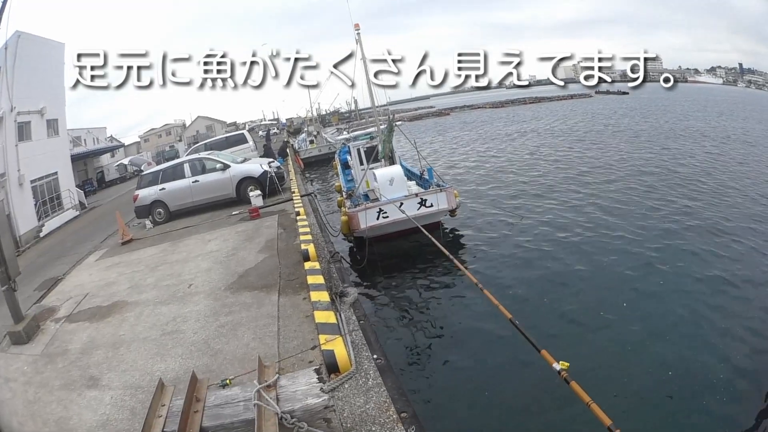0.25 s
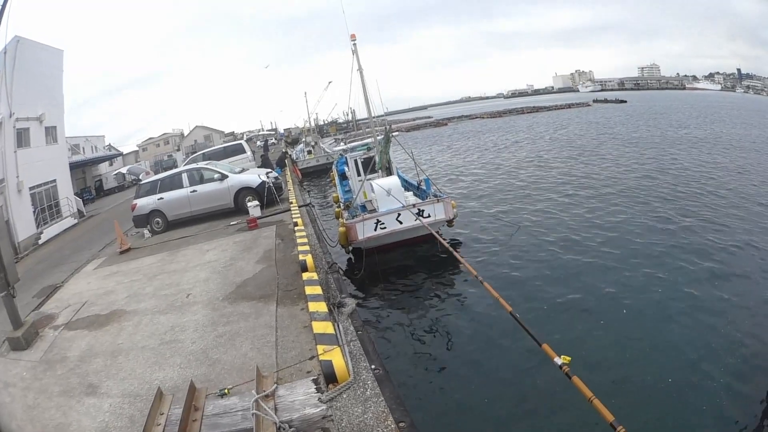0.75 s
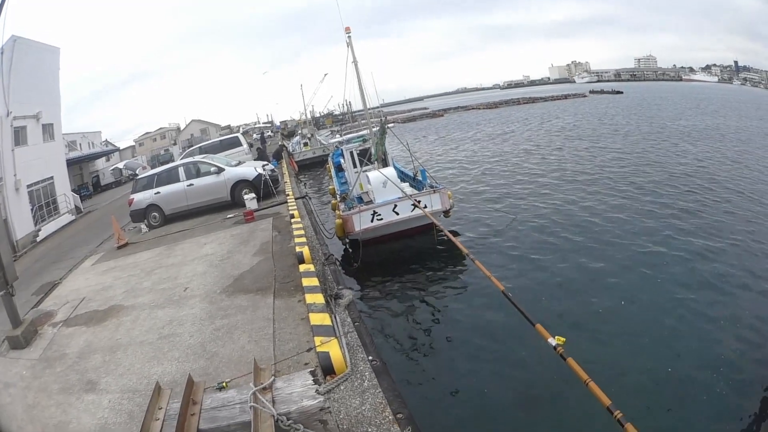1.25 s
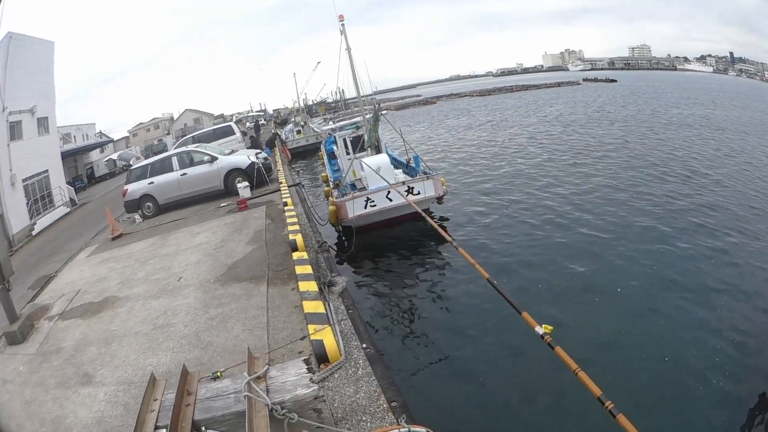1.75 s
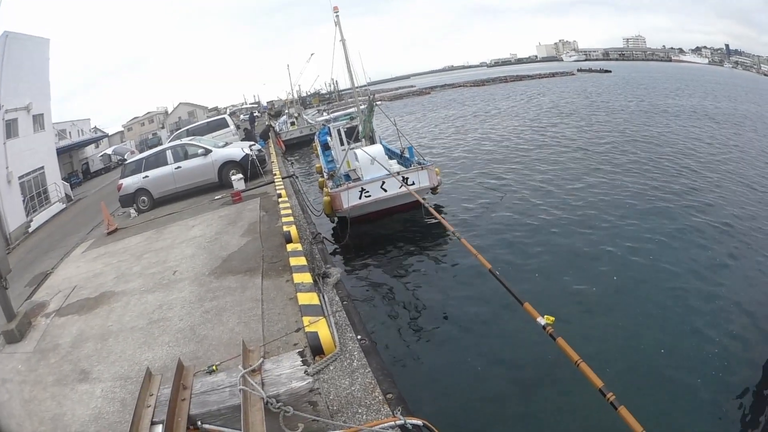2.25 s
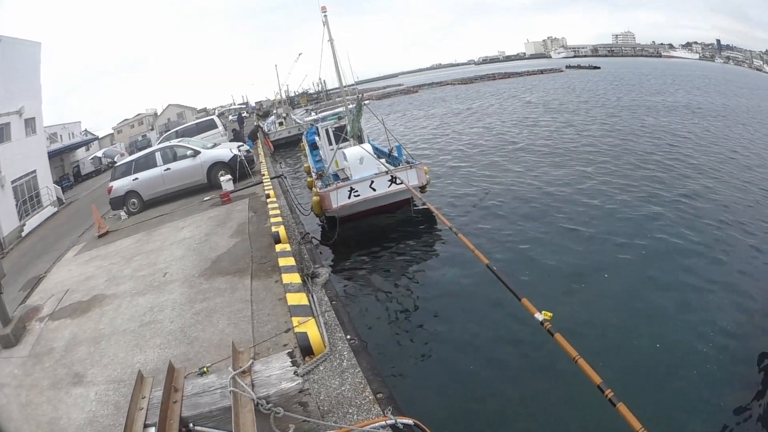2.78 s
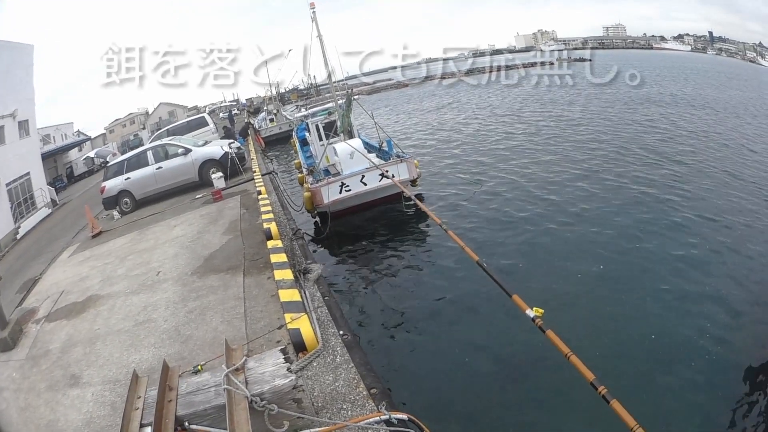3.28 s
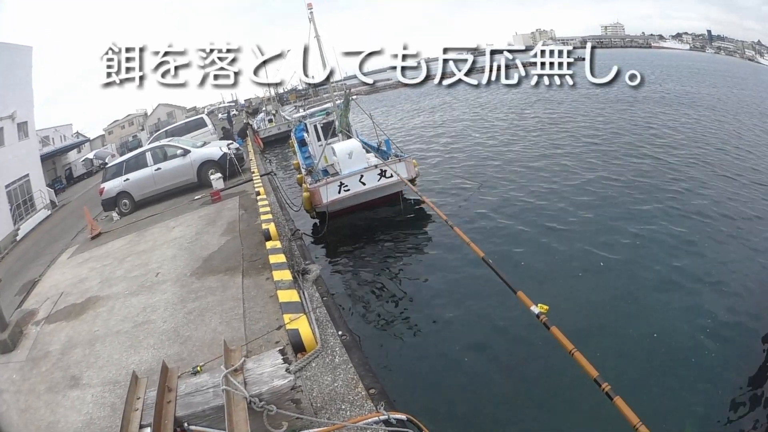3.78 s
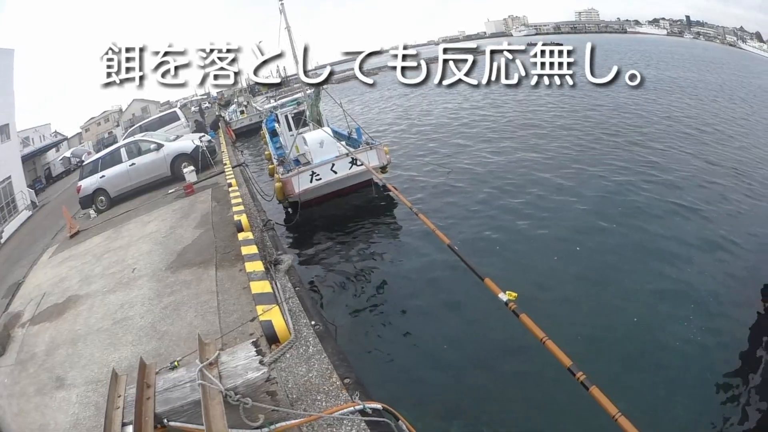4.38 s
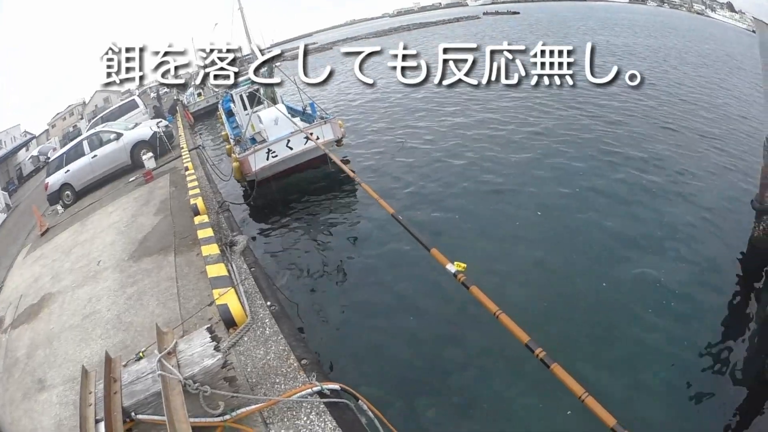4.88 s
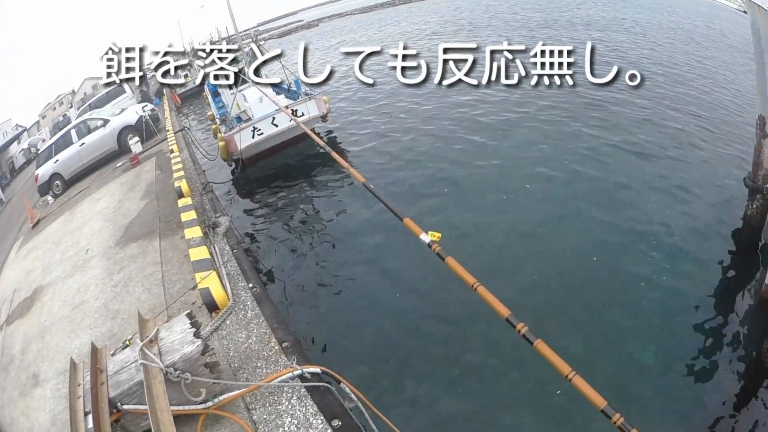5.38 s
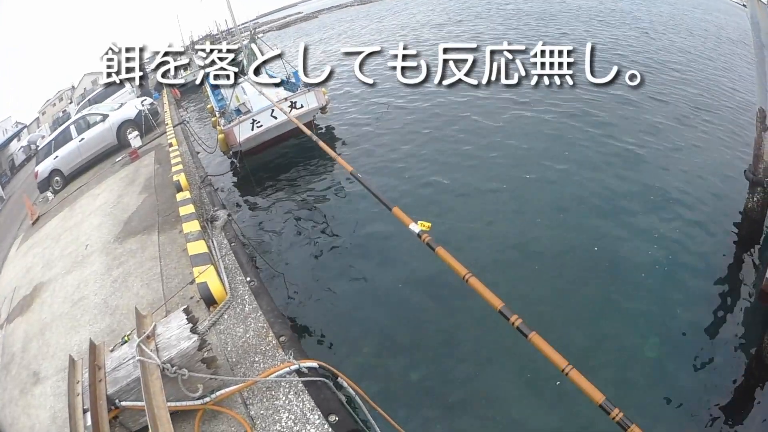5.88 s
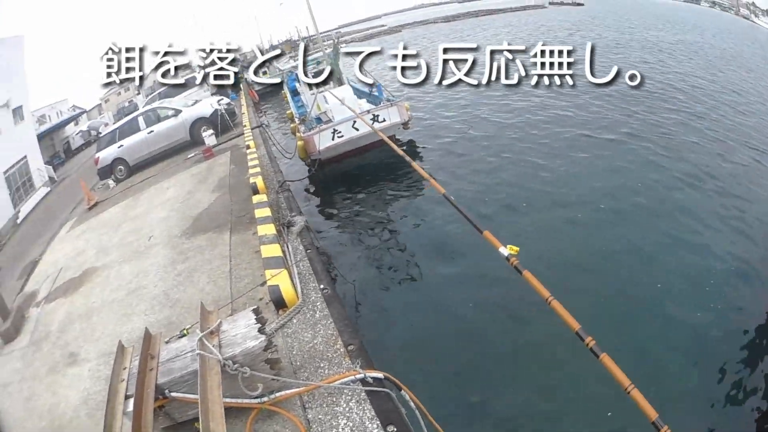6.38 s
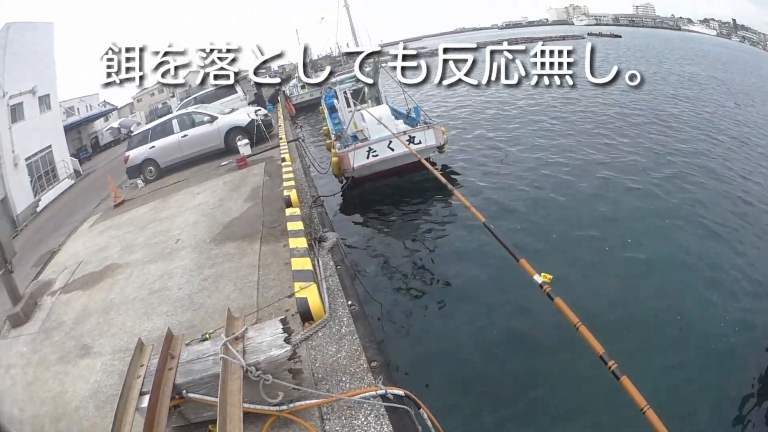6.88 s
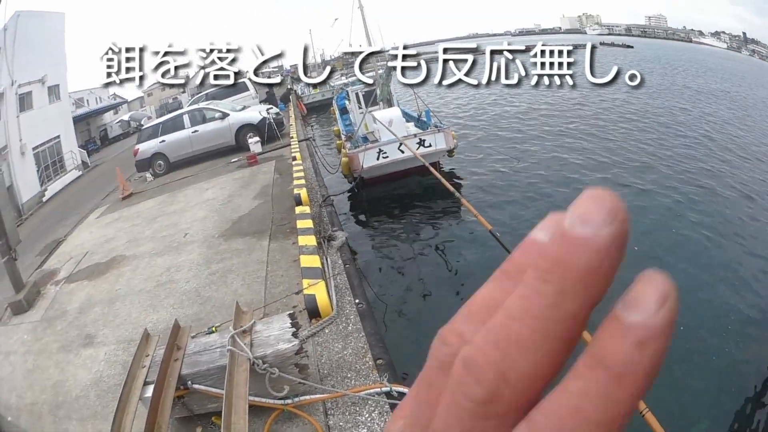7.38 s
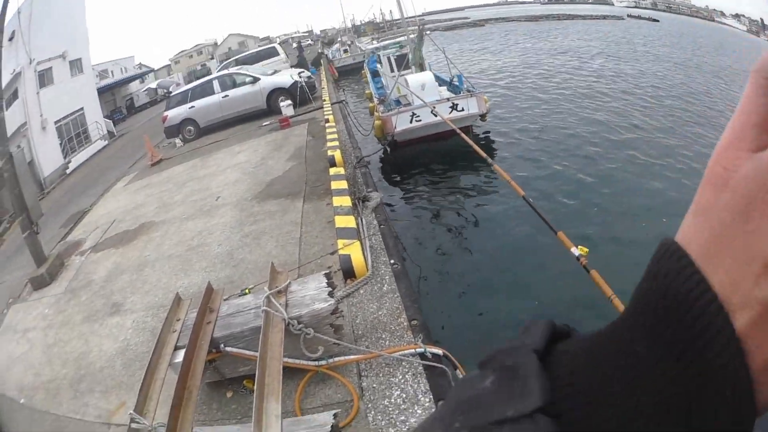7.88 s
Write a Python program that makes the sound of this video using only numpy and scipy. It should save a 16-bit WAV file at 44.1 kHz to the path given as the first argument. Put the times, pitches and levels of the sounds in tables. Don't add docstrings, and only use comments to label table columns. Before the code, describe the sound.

Outdoor harbour edge, heard close through a small camera's case: steady mid-pitched bubble wash that swells and sinks gently, with low slosh and faint thin hiss. Water slaps a hollow in the wall, most strongly early and again before three seconds. Single drips tick and plop throughout, busier later. A brief bright fabric rustle closes it, over very faint rumble and buzz.

```python
import sys
import numpy as np
from scipy import signal
from scipy.io import wavfile

SR = 44100
rng = np.random.default_rng(int(sys.argv[2]) if len(sys.argv) > 2 else 0)


def wav_out(sig):
    wavfile.write(sys.argv[1], SR, np.round(np.clip(np.atleast_2d(sig).T, -1, 1) * 32767).astype(np.int16))


def gain_from_db(level_db):
    decades = np.asarray(level_db, float) / 20
    return 10 ** decades


N = 358974

# t/s into the picture, half length/s, peak level/dB
BUZZ_BURSTS = [(0.004, 0.00011, -54.5), (0.01, 0.0002, -50.5), (.0022, 0.00027, -61), (0.005, 0.00013, -67),
               (0.0034, 0.00098, -51.5)]
BUZZ_PITCHES = [48000 - 553 * 60000 / 1001] * 3 + [10000, 113 * 60000 / 1001]
PICTURE_HZ = 60000 / 1001
# f/Hz, width/Hz, added level/dB
CASE_RESONANCES = [(3463, 280, 4.5), (10000, 4700, -27), (15100, 990, -3)]
# f/Hz, width/Hz
CAMERA_NOTCHES = [(4550, 6570), (5700, 6330)]
RUMBLE_DB, BASS_CUT_HZ, TOP_HZ = -71, 155, 15470

# t/s, level/dB
SLEEVE_STROKE = [
    (7.72, -73),
    (7.75, -73),
    (8.14, -56),
]
# t/s, peak level/dB, f/Hz
CRACKLES = [(1.017, -43, 7750), (1.241, -38, 6940), (3.0114, -43, 6610), (3.021, -40, 6600),
            (3.0364, -58, 14900), (3.1796, -47, 9820), (3.8091, -50, 9010), (4.4232, -51, 10300),
            (5.8066, -47, 9500), (6.09, -52, 9850), (6.328, -48, 8840), (6.528, -42, 15000),
            (6.555, -48, 10000), (7.77, -45, 9800), (7.9018, -53, 15100), (7.924, -38, 9800),
            (7.9293, -42, 10000), (7.9494, -45, 15400), (7.9794, -37.5, 10000), (7.9924, -47, 9930),
            (8.0081, -45, 14900), (8.0251, -43, 15500), (8.052, -40, 15300), (8.0654, -50, 15000),
            (8.1168, -41, 9350), (8.1168, -45, 15300)]

# t/s, slosh level/dB, spray level/dB
LAPPING = [
    (0.0, -40, -59.5),
    (0.92, -48.5, -60),
    (1.22, -46, -60),
    (3.73, -50, -60.5),
    (4.65, -46.5, -60.5),
    (6.56, -49, -59.5),
    (6.88, -44.5, -60),
    (7.55, -49, -60),
    (7.7, -46.5, -58.5),
]
# t/s, level/dB
WASH_SWELL = [(0.0, -35.5), (1.29, -36), (1.68, -35.5), (2.02, -36.5), (2.7, -35.5), (3.35, -37),
              (3.9, -34.5), (4.92, -34.5), (5.05, -35.5), (5.24, -37), (5.55, -34.5), (5.87, -33.5),
              (6.14, -35.5), (6.62, -34), (7.14, -35.5), (7.52, -34.5), (7.87, -37), (8.14, -37.5)]
# f/Hz, level/dB per Hz
SPRAY_SPECTRUM = [(4000, -64), (5200, 13.5), (6700, 16), (8000, -8.5), (10000, 9.5), (12900, -13),
                  (15000, -3.5), (17000, -4.5)]
SLOSH_SPECTRUM = [(80, -6), (141, -0.5), (230, -3), (400, 1.5), (600, 2), (900, -8)]
WASH_SPECTRUM = [(300, -21.5), (500, -10), (800, -4.5), (1290, -0.5), (1700, -1), (2160, -2.5),
                 (2700, -8.5), (3300, -12.5), (4000, -31), (5000, -52)]

# t/s, peak level/dB, f/Hz, cycles of ring
SLAPS = [(0.002, -33, 240, 1.2), (0.053, -31, 240, 2.2), (0.072, -32, 220, 2.1), (0.158, -38, 290, 3.0),
         (0.295, -27.5, 240, 2.7), (0.303, -25, 550, 2.6), (0.337, -22, 320, 4.5), (0.422, -19.5, 308, 3),
         (0.433, -17, 350, 2), (0.45, -28, 225, 3.7), (0.476, -22.5, 400, 1.8), (0.521, -23, 614, 1.2),
         (1.072, -31, 278, 4.4), (1.103, -26, 536, 1.8), (1.529, -26, 600, 4.6), (1.87, -32.5, 285, 6),
         (1.895, -24, 620, 4.0), (1.941, -32, 244, 1.7), (1.954, -27.5, 460, 2.3), (2.719, -20.5, 485, 4.2),
         (2.757, -24, 305, 1.8), (2.77, -25.5, 450, 5.6), (2.897, -24, 670, 2.3), (3.018, -26.5, 544, 3.1),
         (3.03, -27, 340, 5.9), (3.05, -25.5, 290, 0.68), (5.028, -30.5, 420, 5.8), (7.106, -33, 282, 3.1),
         (7.275, -33.5, 447, 9), (7.491, -25, 600, 4.2)]
# t/s, peak level/dB
GULPS = [(0.317, -32), (0.901, -39), (1.834, -29), (2.025, -34), (2.715, -35), (2.889, -45), (2.805, -43),
         (2.98, -36), (3.173, -35), (6.728, -38), (6.865, -37), (7.137, -39), (7.406, -43), (7.536, -32),
         (7.594, -41)]
HOLLOW_HZ, HOLLOW_CYCLES = 153.3, 1.38
BOOM_LAG_S, BOOM_DB, BOOM_FOLLOWS = 0.0044, -44.5, 0.26

# t/s, peak level/dB, f/Hz
SINGLE_DROPS = [(0.54, -11.5, 2380), (0.875, -18, 2100), (0.959, -17, 2000), (1.019, -14, 2490),
                (2.331, -16, 1800), (2.356, -16, 1890), (2.605, -17, 2030), (3.241, -19, 1930), (3.347, -19, 1960),
                (3.434, -18.5, 1810), (3.723, -16.5, 2020), (3.811, -17.5, 2460), (3.993, -17, 1970),
                (4.091, -17, 2220), (4.117, -12, 1730), (4.248, -13.5, 1730), (4.368, -18, 1705),
                (4.603, -17, 1860), (4.738, -21, 1780), (4.828, -16.5, 2090), (5.001, -18.5, 1660),
                (5.67, -20, 2030), (5.746, -14, 1540), (6.093, -14.5, 2490), (6.33, -17, 1790), (6.679, -19, 2020),
                (7.323, -17.5, 2570), (7.401, -18, 2350), (7.575, -13, 1880), (8.032, -17.5, 2520),
                (0.288, -23, 704), (0.304, -25, 745), (0.425, -15, 840), (0.4384, -8, 1165), (0.901, -26, 1470),
         (1.527, -17.5, 1300), (1.558, -13.5, 1280), (1.895, -21, 753), (2.8, -20, 1450), (3.5, -18, 1450),
         (3.816, -19, 1390), (3.865, -20, 1290), (4.431, -8.5, 1570), (4.739, -18, 1320),
         (4.782, -18.5, 1160), (5.015, -18.5, 1600), (5.442, -17, 1340), (5.592, -20.5, 1330),
         (5.718, -14.5, 1670), (5.808, -22, 1480), (6.03, -13, 1320), (6.167, -16, 1680),
         (6.388, -22, 1240), (6.627, -18, 1360), (6.783, -12, 1620), (6.812, -18, 1650), (7.121, -23, 1590),
         (7.311, -19, 1380), (7.371, -24, 1290), (7.601, -16.5, 1330),
                (0.374, -26, 3680), (0.477, -20, 2200), (0.494, -21, 1990), (0.718, -19.5, 2230),
         (1.058, -19, 2430), (1.224, -20, 2050), (1.833, -22, 2530), (1.894, -21.5, 2080),
         (2.245, -25, 2440), (2.487, -25, 3100), (2.526, -28, 3200), (2.585, -21, 2200), (3.146, -20, 1850),
         (3.16, -19, 2070), (3.548, -19, 2430), (3.811, -20, 3600), (4.136, -19.5, 2500),
         (4.357, -16.5, 2130), (4.486, -20.5, 2190), (4.953, -21.5, 2030), (5.365, -17, 1950),
         (5.959, -18, 1830), (6.092, -23, 3600), (6.28, -21.5, 2500), (6.303, -17.5, 2630),
         (6.349, -20.5, 3100), (6.559, -25, 1490), (6.9, -18, 2000), (6.911, -21, 2410), (7.2, -20, 1900)]
DROPLET_COUNT = 60
DROPLET_TOP_DB, DROPLET_FALL_DB, DROPLET_HZ, DROPLET_OCTAVES = -24.5, 0.5, 1600, 0.56
DROP_CYCLES, CYCLES_PER_KHZ, CYCLES_LOST_PER_DB = 5.0, 1.6, 0.03


def in_time(rows):
    s, *columns = np.transpose(rows)
    return [np.interp(np.arange(N) / SR, s, column) for column in columns]


def rms_one(x):
    return x / np.sqrt(np.mean(x ** 2) + 1e-20)


def drift(rate):
    r = np.exp(-64 * np.pi * rate / SR)
    noise = rng.standard_normal(N // 32 + 1002)
    slow = signal.lfilter([1], [1, -2 * r, r * r], noise)[1000:]
    return np.interp(np.arange(N) / 32, np.arange(len(slow)), rms_one(slow))


def ring(clicks, hz, t60):
    r = gain_from_db(-60 / (t60 * SR))
    w = 2 * np.pi * hz / SR
    return signal.lfilter([0, np.sin(w)], [1, -2 * r * np.cos(w), r * r], clicks + 1e-18)


def random_grains(spread_db):
    return gain_from_db(spread_db * np.minimum(rng.exponential(1, N), 4)) * rng.choice([-1, 1], N)


def pops(events, rise, glide, partner, partner_db, tail_db, tail_s, gain_db):
    length = 4096
    out, t = np.zeros(N + length), np.arange(length) / SR
    noises = rng.standard_normal((len(events), length))
    for (s, db, hz, cycles), noise in zip(events, noises):
        turns = hz * t
        ring_cycles = max(cycles, 1)
        swell = 1 - np.exp(-(turns / (rise * ring_cycles)) ** 2)
        shape = swell * gain_from_db(-30 * turns / ring_cycles)
        phase = 2 * np.pi * turns * (1 + glide * np.minimum(turns, cycles))
        tones = np.sin(phase) + gain_from_db(partner_db) * np.sin(partner * phase)
        body = shape / shape.max() * tones
        tail = gain_from_db(tail_db - 60 * t / tail_s) * np.minimum(turns, 1)
        splutter = rms_one(ring(noise, hz, 15.0 / hz)) * tail
        at = round(s * SR)
        out[at:at + length] += gain_from_db(db + gain_db) * (body + splutter)
    return out[:N]


def water_noise(spectrum, shared, own_db, grain_share, grains_per_s, spread_db):
    hz, db = np.transpose(spectrum)
    edges = np.geomspace(hz[0], hz[-1], round(3 * np.log2(hz[-1] / hz[0])) + 1)
    out, share = np.zeros(N), np.clip(grain_share, 0, 1)
    white = rng.standard_normal((2, N))
    size = random_grains(spread_db)
    chance = grains_per_s * gain_from_db(shared) / SR
    for k, (low, high) in enumerate(zip(edges, edges[1:])):
        bursts = rms_one(size * (rng.random(N) < chance))
        drive = np.sqrt(1 - share) * white[k % 2] + np.sqrt(share) * bursts
        band = signal.sosfilt(signal.butter(2, [low, high], "band", fs=SR, output="sos"), drive)
        level_db = np.interp(np.log(low * high) / 2, np.log(hz), db)
        out += gain_from_db(level_db + shared + own_db * drift(18.5)) * band
    return rms_one(out)


def rumble():
    band = signal.butter(2, [15, 140], "band", fs=SR, output="sos")
    return gain_from_db(RUMBLE_DB) * rms_one(signal.sosfilt(band, rng.standard_normal(N)))


def buzz():
    t, out = np.arange(N) / SR, np.zeros(N)
    picture, within = np.divmod(t, 1 / PICTURE_HZ)
    picture = picture.astype(int)
    for (s, half_s, db), hz in zip(BUZZ_BURSTS, BUZZ_PITCHES):
        height = gain_from_db(db + 3.1 * rng.standard_normal(picture[-1] + 1))
        rough = rms_one(ring(rng.standard_normal(N), hz, 0.00091))
        whine = np.sin(2 * np.pi * hz * t) + 0.32 * rough
        out += height[picture] * np.exp(-0.5 * ((within - s) / half_s) ** 2) * whine
    return out


def sleeve():
    s, db = np.transpose(SLEEVE_STROKE)
    stroke = gain_from_db(np.interp(np.arange(N) / SR, s, db, left=-120))
    snaps = random_grains(4.0) * (rng.random(N) < 3000 / SR)
    fibres = ring(snaps, 9900, 0.004) + 0.72 * ring(snaps, 8600, 0.003) + 0.4 * ring(snaps, 15100, 0.005)
    snapped = [(*row, 22) for row in CRACKLES]
    crackles = pops(snapped, rise=0.2, glide=0, partner=0.9, partner_db=-3,
                    tail_db=-7, tail_s=0.06, gain_db=0)
    return gain_from_db(2.0) * stroke * rms_one(fibres) + crackles


def booms():
    after = [(s + BOOM_LAG_S, BOOM_DB + BOOM_FOLLOWS * (db + 28)) for s, db, *_ in SLAPS]
    return [(s, db, HOLLOW_HZ, HOLLOW_CYCLES) for s, db in after + GULPS]


def slaps():
    return pops(SLAPS + booms(), rise=0.15, glide=0.028, partner=1.63, partner_db=-10,
                tail_db=-14.5, tail_s=0.14, gain_db=3.0)


def droplets(swell_db):
    when, size, pitch = rng.random((DROPLET_COUNT, 3)).T
    s = when * (N - 1) / SR
    swell = swell_db[(s * SR).astype(int)] - swell_db.mean()
    db = DROPLET_TOP_DB + DROPLET_FALL_DB * np.log(size) + 0.95 * swell
    hz = DROPLET_HZ * 2 ** (DROPLET_OCTAVES * (2 * pitch - 1))
    return list(zip(s, db, hz))


def drops(swell_db):
    events = []
    for s, db, hz in SINGLE_DROPS + droplets(swell_db):
        cycles = DROP_CYCLES + CYCLES_PER_KHZ * hz / 1000 - CYCLES_LOST_PER_DB * (db + 20)
        events.append((s, db, hz, cycles))
    ringing = pops(events, rise=0.15, glide=0.004, partner=0.533, partner_db=-13,
                   tail_db=-18, tail_s=0.073, gain_db=1.0)
    return signal.sosfilt(signal.butter(2, [380, 4200], "band", fs=SR, output="sos"), ringing)


def spray(level_db, swell_db, surge, flutter):
    shared = 0.36 * surge + 0.5 * (swell_db - swell_db.mean()) + 0.84 * flutter
    hiss = water_noise(SPRAY_SPECTRUM, shared, own_db=-0.5, grain_share=0.29,
                       grains_per_s=300, spread_db=2.5)
    return gain_from_db(level_db + 7.5) * hiss


def slosh(level_db, surge):
    shared = 1.4 * surge + 0.24 * drift(27)
    return gain_from_db(level_db) * water_noise(SLOSH_SPECTRUM, shared, own_db=1.5, grain_share=0.12,
                                       grains_per_s=40, spread_db=5.5)


def wash(swell_db, flutter):
    bubbles = water_noise(WASH_SPECTRUM, 1.1 * flutter, own_db=0.86, grain_share=0.47,
                          grains_per_s=170, spread_db=3.0)
    return gain_from_db(swell_db + 0.95 * drift(4.9) + 3.5) * bubbles


def scene():
    (swell_db,) = in_time(WASH_SWELL)
    slosh_db, spray_db = in_time(LAPPING)
    surge, flutter = drift(1.8), drift(42)
    bed = wash(swell_db, flutter) + slosh(slosh_db, surge) + spray(spray_db, swell_db, surge, flutter)
    return (bed + drops(swell_db) + slaps() + sleeve())[None]


def low_pass(x):
    return signal.sosfilt(signal.butter(12, 16470, fs=SR, output="sos"), x)


def record(dry):
    x = signal.sosfilt(signal.butter(3, BASS_CUT_HZ, "high", fs=SR, output="sos"), dry)
    for hz, width_hz, db in CASE_RESONANCES:
        x = x + gain_from_db(db) * signal.lfilter(*signal.iirpeak(hz, hz / width_hz, fs=SR), x)
    x = x + rumble() + buzz()
    for hz, width_hz in CAMERA_NOTCHES:
        x = signal.lfilter(*signal.iirnotch(hz, hz / width_hz, fs=SR), x)
    mix = signal.sosfilt(signal.ellip(10, 0.5, 50, TOP_HZ, fs=SR, output="sos"), x)
    return low_pass(mix)


dry = scene()
out = record(dry)
wav_out(out)
```